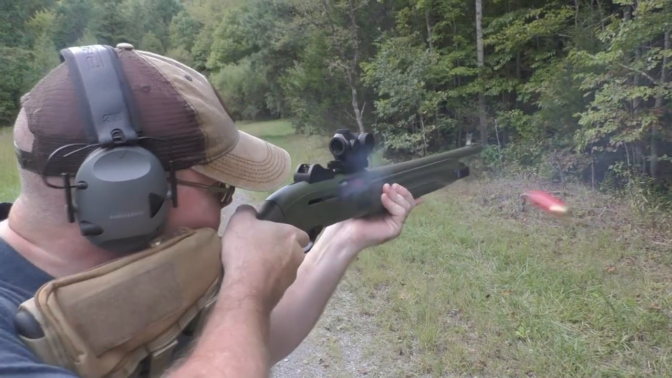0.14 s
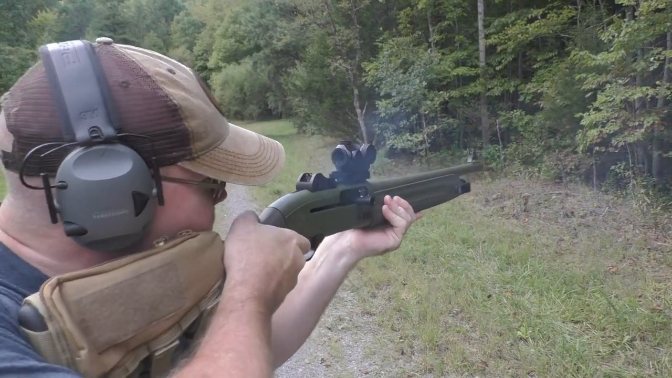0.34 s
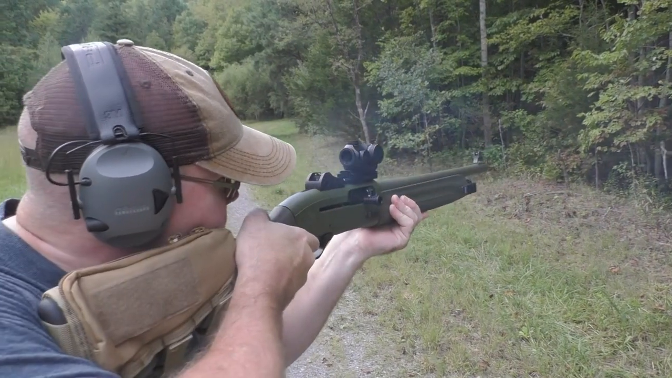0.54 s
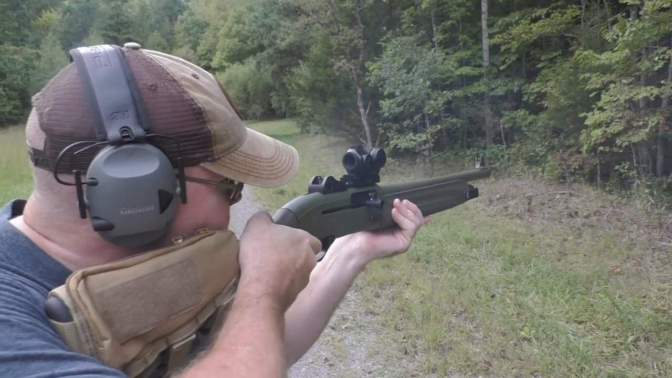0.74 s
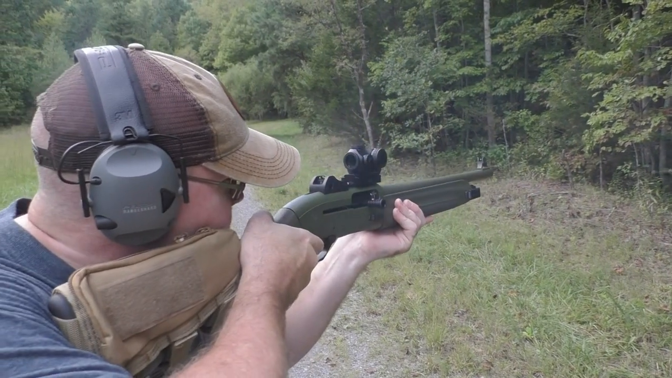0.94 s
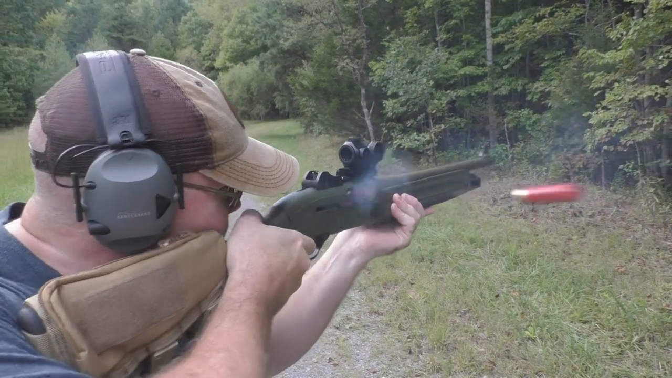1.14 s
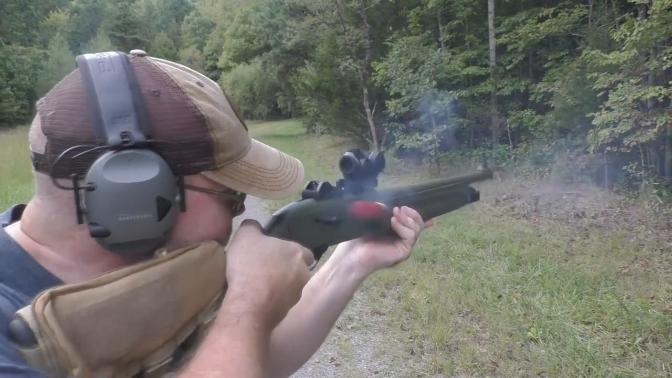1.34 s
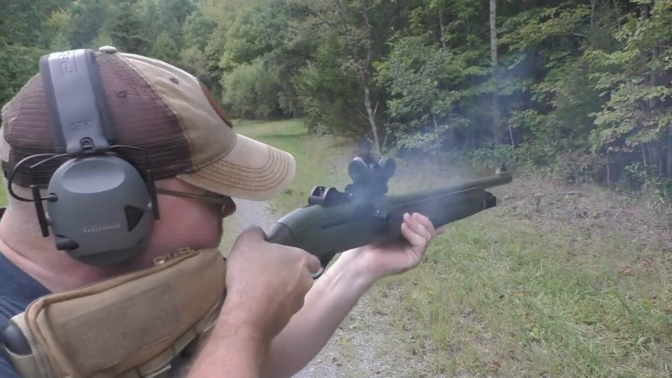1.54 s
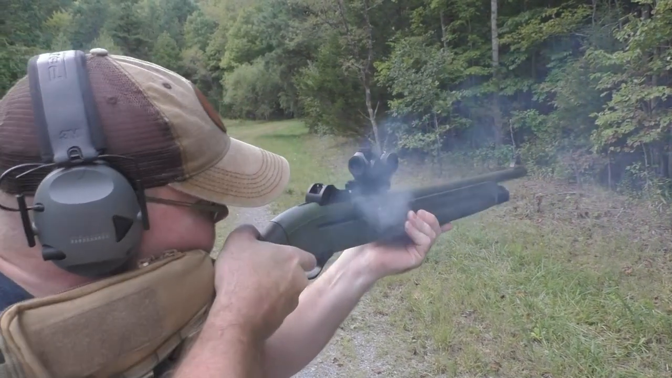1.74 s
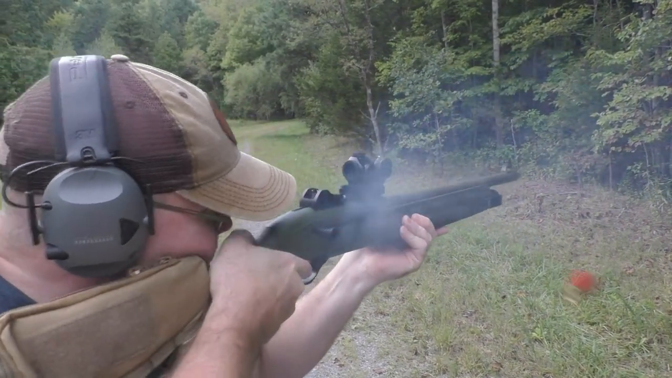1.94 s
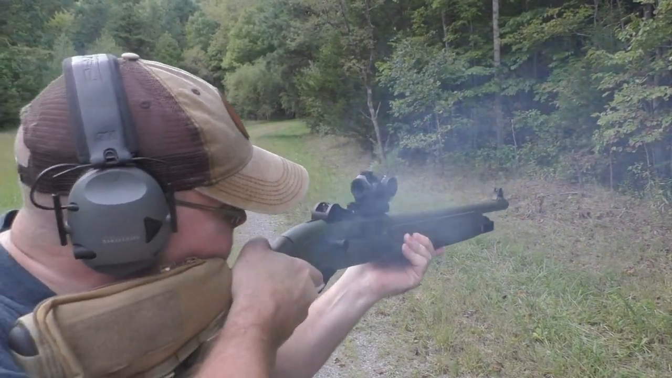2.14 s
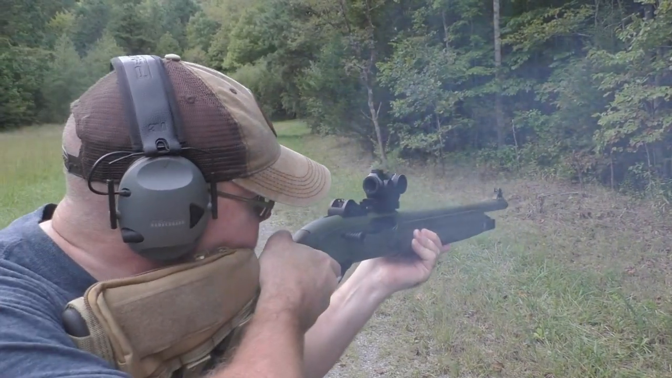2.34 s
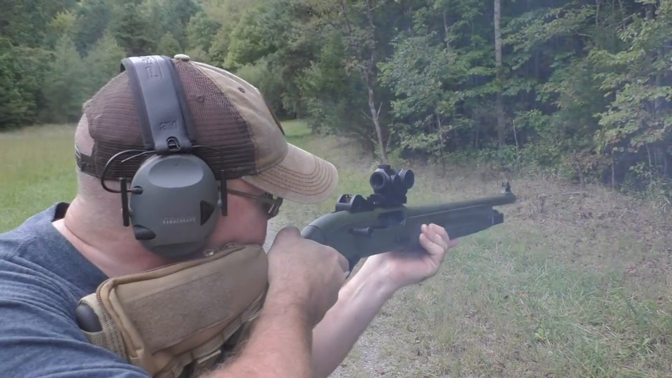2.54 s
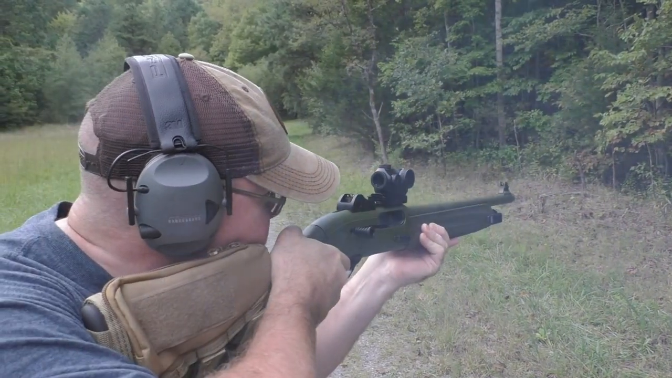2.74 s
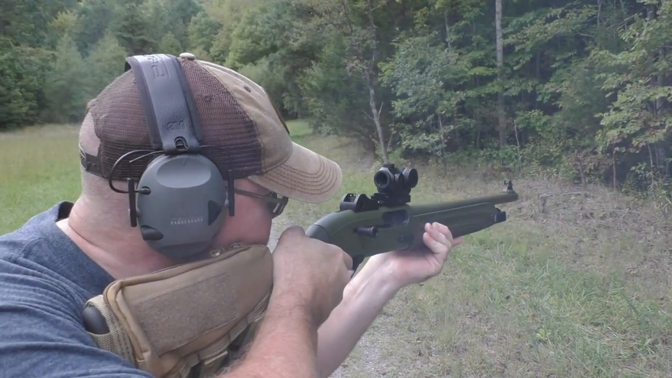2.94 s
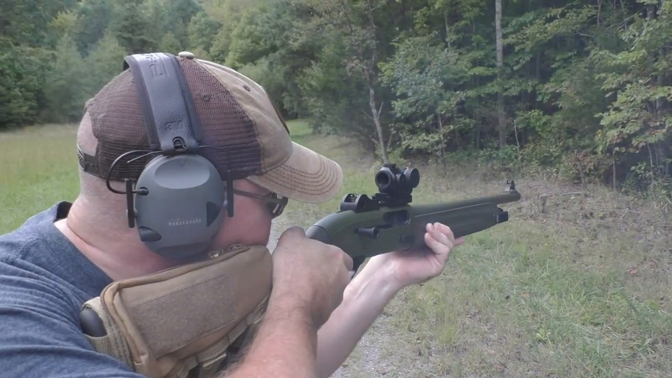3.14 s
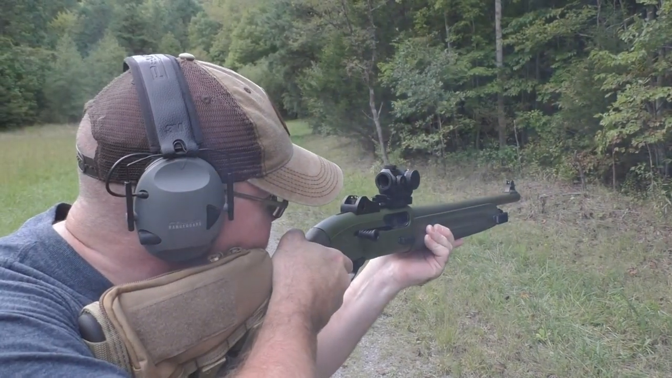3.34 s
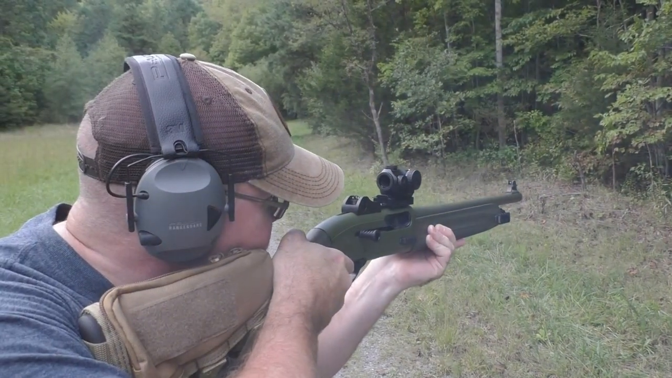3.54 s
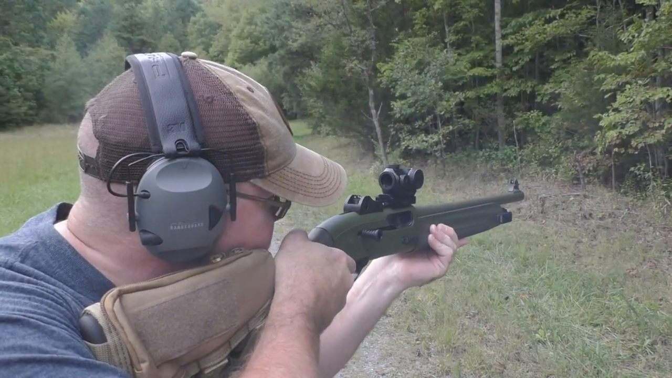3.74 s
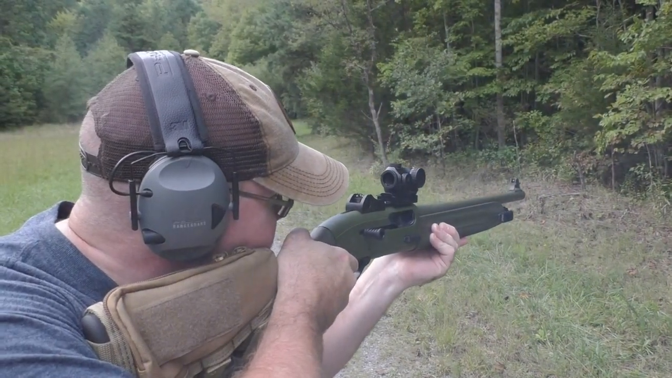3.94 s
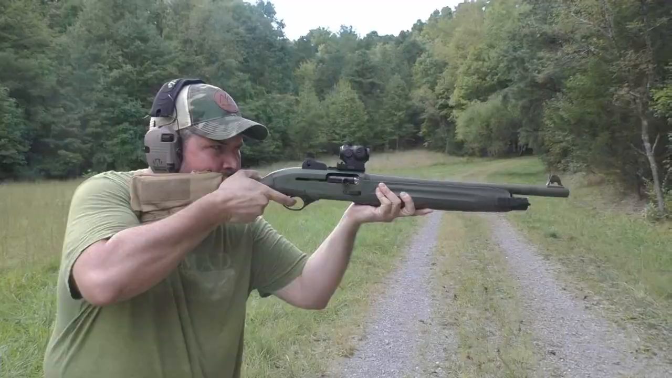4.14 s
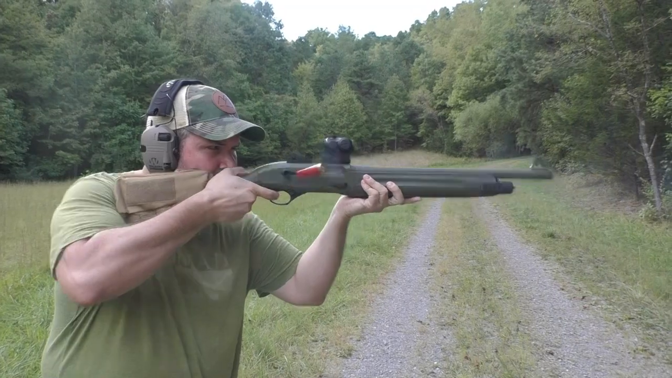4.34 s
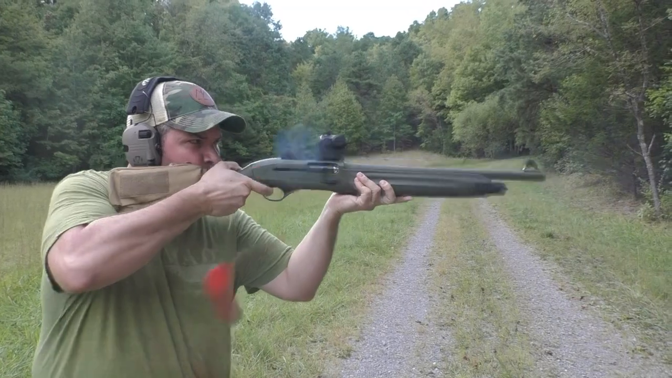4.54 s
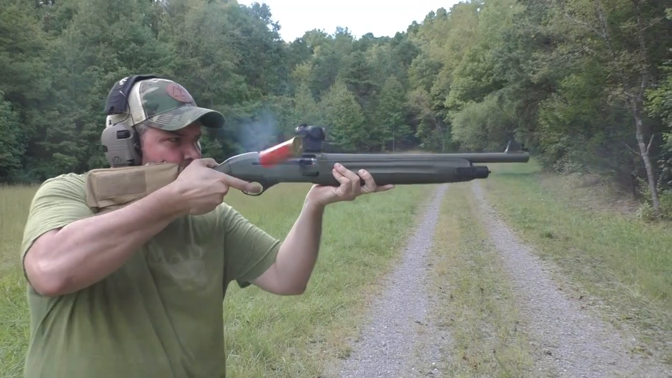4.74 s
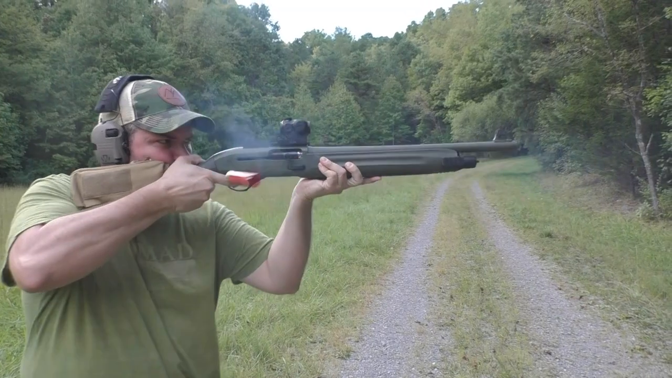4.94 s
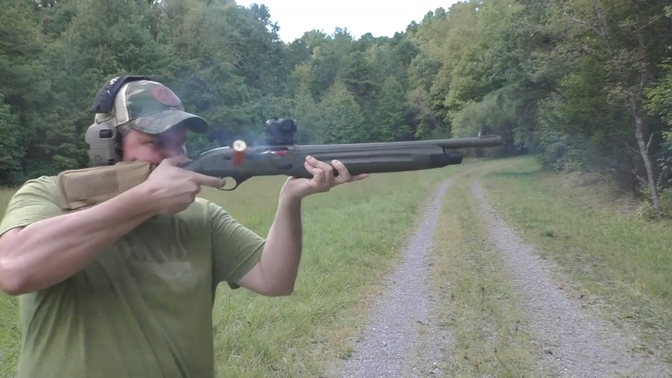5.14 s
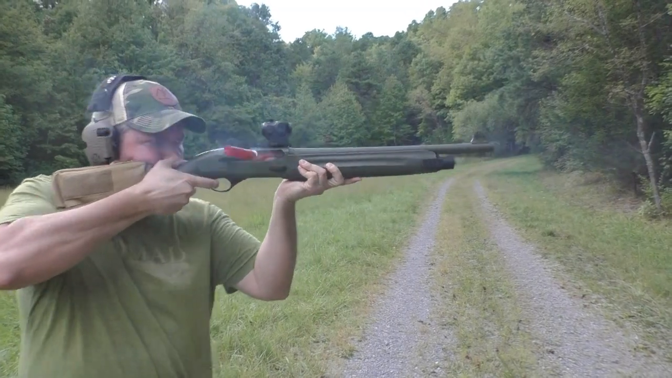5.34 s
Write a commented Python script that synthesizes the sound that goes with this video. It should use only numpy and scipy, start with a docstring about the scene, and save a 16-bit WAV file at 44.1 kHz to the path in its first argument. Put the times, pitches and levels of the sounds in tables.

```python
"""On a forest range, a semi-automatic shotgun is fired beside the camera, from two stands in turn.
Each shot is a burst of noise with metal clacks, low thumps off large surfaces, a crackle from near trees
and a long roll through the woods. Small gun clicks are shaped noise too.
Behind them are still air, pulsing crickets and, at the second stand, a katydid.
The camera's gain control ducks at every shot and lets the echo swell back."""
import sys
import numpy as np
from scipy import signal
from scipy.fft import rfft, irfft
from scipy.io import wavfile
from scipy.ndimage import uniform_filter1d, minimum_filter1d

SR = 44100
rng = np.random.default_rng(int(sys.argv[2]) if len(sys.argv) > 2 else 0)


def dump(signal):
    """Clip the signal to [-1, 1] and save it as 16-bit WAV at the path in sys.argv[1]."""
    limited = np.clip(np.atleast_2d(signal).T, -1, 1)
    pcm = np.round(limited * 32767).astype(np.int16)
    wavfile.write(sys.argv[1], SR, pcm)


N = 237875
TIME = np.arange(N) / SR  # seconds
MOVE_S = 4.132  # the second stand begins here

# Stereo width of sound from close by. Each row: pitch in Hz, side level minus middle level in dB.
NEAR_WIDTH = [(100, -1), (400, -5), (1200, -2), (2500, -3), (4500, -6), (8000, -17), (15000, -17)]
# Stereo width of sound from far off. Each row: pitch in Hz, side level minus middle level in dB.
FAR_WIDTH = [(100, -5), (400, -13), (1300, -6), (2500, -3), (4500, -4), (8000, -12), (15000, -15)]


def undb(db):
    """Turn decibels into a gain factor."""
    return 10 ** (np.asarray(db) / 20)


def on_log_axis(hz, points):
    """Read a value at each pitch from (Hz, value) points, with pitch on a logarithmic axis."""
    point_hz, value = np.transpose(points)
    return np.interp(np.log(np.maximum(hz, 1)), np.log(point_hz), value)


def noise(colour, width, count=N):
    """Stereo noise of rms 1: random phases with a given spectrum and stereo width."""
    hz = np.fft.rfftfreq(count, 1 / SR)
    mid, side = np.exp(2j * np.pi * rng.random((2, len(hz))))
    spread = undb(on_log_axis(hz, width))
    gain = undb(on_log_axis(hz, colour)) / np.sqrt(1 + spread ** 2)
    left, right = mid + spread * side, mid - spread * side
    sound = irfft(gain * np.array([left, right]), count)
    return sound / sound.std()


def walk(rate, count=N):
    """Smooth random wandering: random steps at about this rate in Hz, averaged over one step."""
    hold = max(int(SR / rate), 2)
    steps = np.repeat(rng.standard_normal(count // hold + 1), hold)
    return uniform_filter1d(steps, hold)[:count]


def add(out, sound, start_s):
    """Mix a sound into out at a given time, leaving off whatever falls outside."""
    start = int(round(start_s * SR))
    begin, end = max(start, 0), min(start + sound.shape[1], out.shape[1])
    if end > begin:
        out[:, begin:end] += sound[:, begin - start:end - start]


def burst(t, rise_s, hold_s, decay_s):
    """Loudness curve that rises in a straight line, holds and dies away."""
    return np.clip(t / rise_s, 0, 1) * np.exp(-np.maximum(t - hold_s, 0) / decay_s)


def band_of(spectrum, octaves_off):
    """One band of a spectrum, as sound; it fades to nothing one octave either side of its centre."""
    return irfft(spectrum * np.maximum(1 - abs(octaves_off), 0))


def muzzle_blast(colour, length_s):
    """The shock and the turbulent gas jet behind it, as a noise burst that is new at every shot."""
    t = TIME[:SR // 8]
    jet = noise(colour, NEAR_WIDTH, count=len(t))
    return jet * burst(t, rise_s=.002, hold_s=length_s, decay_s=.0075)


def steel(db, length_s):
    """A short, dry sound coloured like the clack of steel parts in the gun, made of noise."""
    t = TIME[:SR // 8]
    # Each row: pitch in Hz, strength in dB.
    colour = [(100, -15), (330, 5), (800, -7), (1500, 0), (3500, -3), (6000, -7), (10500, -3), (15500, -8)]
    clack = noise(colour, NEAR_WIDTH, count=len(t))
    return undb(db) * clack * burst(t, rise_s=.001, hold_s=length_s, decay_s=.005)


def thump(distance):
    """A few cycles of low pressure return from each large surface; distance stretches their delays."""
    # Ground slap, gas swell, nearest trunks, the bank's boom and knock, the wood's edge.
    # Each row: delay in seconds before stretching, average pitch in Hz, half length in seconds, level in dB.
    low_waves = [(.008, 122, .005, 7), (.02, 42, .016, -1.5), (.02, 300, .007, .5), (.04, 82, .014, -1),
                 (.046, 262, .004, 4), (.122, 318, .0055, 3)]
    # Far slopes answer with evenly spaced low knocks, each 2 dB weaker; same columns.
    slopes = [(.362 + .1 * k, 345, .01, -12 - 2 * k) for k in range(3)]
    # The earliest wave comes from the side; later ones come more and more from ahead.
    side_phase_rad, turn_ahead_s = 2.1, .045
    ears = np.array([[.5], [-.5]])  # left and right share the phase difference
    t, out = TIME[:2 * SR // 3], 0
    for delay, hz, length, db in low_waves + slopes:
        nearness = np.exp(-delay / turn_ahead_s)
        # No two shells push alike, so the pitch varies, most of all in the early waves.
        pitch = hz * (1 + (.02 + .14 * nearness) * rng.standard_normal())
        since = t - delay * distance
        swing = np.sin(2 * np.pi * pitch * since + ears * side_phase_rad * nearness)
        out = out + undb(db) * np.exp(-(since / length) ** 2) * swing
    return out


def near_trees(colour, db, arrive_s, decay_s):
    """Trunks and bushes close by throw back a dense, uneven crackle."""
    t = TIME[:SR // 2]
    uneven = undb(2.4 * walk(900, count=len(t)) + .8 * walk(120, count=len(t)))
    envelope = burst(t, rise_s=.018, hold_s=arrive_s, decay_s=decay_s)
    return undb(db) * noise(colour, NEAR_WIDTH, count=len(t)) * uneven * envelope


def woods(db):
    """The long roll: it spreads with distance, loses treble on the way and blooms at the forest edge."""
    # Colour of the far woods; soft ground swallows a band near 800 Hz.
    # Each row: pitch in Hz, strength in dB per Hz.
    woods_colour = [(30, -30), (90, -21), (170, -19), (290, -4), (440, 1), (620, -7), (830, -14),
                    (1150, -5), (1900, -5), (3200, -9), (6000, -15), (10000, -15), (15500, -21)]
    # Air and foliage take more at high pitch, the ground takes more in the bass.
    # The losses are in dB per second, air and ground at 1 kHz; the power is a plain number.
    base_loss, air_loss, ground_loss, air_power = 2.8, 6.2, 1.1, .78
    # The roll builds up, then blooms at the edge; its lows come later (rise and edge times at 1 kHz).
    rise_s, rise_power, spread_s = .27, 1.3, .1
    edge_s, edge_width_s, edge_bloom_db, later_per_octave = .36, .16, 3.5, .14

    t = TIME[:3 * SR]
    spectrum = rfft(noise(woods_colour, FAR_WIDTH, count=len(t)))
    hz = np.fft.rfftfreq(len(t), 1 / SR)
    octave = np.log2(np.clip(hz, 125, 16000) / 125)  # octaves above 125 Hz
    out = 0
    for k in range(8):
        khz = 2 ** k / 8  # centre of this band
        loss_db = (base_loss + air_loss * khz ** air_power + ground_loss / khz) * t
        reach_s = t * khz ** later_per_octave
        edge_db = edge_bloom_db * np.exp(-((reach_s - edge_s) / edge_width_s) ** 2)
        rise = np.clip(reach_s / rise_s, 0, 1) ** rise_power
        clumps_db = 2.1 * walk(55, count=len(t))  # groups of trees answer one after another
        out = out + band_of(spectrum, octave - k) * rise * undb(clumps_db + edge_db - loss_db)
    return undb(db) * out / (1 + t / spread_s)


def stand(shots, blast_colour, trees, roll, distance, right_db):
    """All shots from one spot: blast and thump are new each time, trees and roll answer the same way."""
    # One strength drives the blast, trees, thump, bolt and roll; a longer blast pushes more air.
    blast_db, thump_db, usual_length_s, push_db_per_doubling = 14.5, -.5, .005, 3.1
    tick_lead_s, bolt_delay_s, bolt_db = .0035, .111, -5.5
    near, far = np.zeros((2, 2, N))
    for s, db, length_s in shots:
        push_db = push_db_per_doubling * np.log2(length_s / usual_length_s)
        # A faint short tick is heard just before the blast.
        add(near, steel(db=-22, length_s=.002), s - tick_lead_s)
        add(near, undb(blast_db + db) * muzzle_blast(blast_colour, length_s), s)
        add(near, undb(blast_db + db + push_db) * trees, s)
        add(near, steel(db=bolt_db + db, length_s=.012), s + bolt_delay_s)  # the bolt slams shut
        add(far, undb(thump_db + db + push_db) * thump(distance), s)
        add(far, undb(db) * roll, s)
    # Near sound is louder on the right: left goes down as much as right goes up.
    return near * undb(np.array([[-right_db], [right_db]])) + far


def clicks():
    """Trigger and gun fittings make short metal ticks, each with a fainter rattle dying away after it."""
    # Each row: start in seconds, level in dB, rattle level against the tick in dB.
    click_times = [(.8186, -15, -21), (2.549, -37, -24), (3.6655, -39, -9), (4.051, -51, -16)]
    # Colour of the small metal parts. Each row: pitch in Hz, strength in dB per Hz.
    click_colour = [(600, -15), (1800, -1), (3500, -2), (6000, -4), (9500, 0), (13000, -2), (16000, -7)]
    out, t = np.zeros((2, N)), TIME[:SR // 2]
    for s, db, rattle_db in click_times:
        tick = burst(t, rise_s=.0005, hold_s=.002, decay_s=.002)
        rattle = undb(rattle_db) * np.exp(-t / .15)
        add(out, undb(db) * (tick + rattle) * noise(click_colour, FAR_WIDTH, count=len(t)), s)
    return out


def meadow(moved):
    """Still air and crickets are noise, the crickets pulsing; a katydid pulses at the second stand."""
    # Colour of the still air. Each row: pitch in Hz, strength in dB per Hz.
    air_colour = [(25, -7), (60, -5), (95, 5), (150, -9), (350, -5), (700, -12), (1500, -12), (3500, -19),
                  (5000, -16), (9500, -14), (15500, -17)]
    # Colour of the cricket chorus. Each row: pitch in Hz, strength in dB per Hz.
    cricket_colour = [(5300, -35), (5900, -12), (6200, -1), (6550, 0), (7000, -10), (8000, -17),
                      (10000, -35)]
    # Colour of the katydid. Each row: pitch in Hz, strength in dB per Hz.
    katydid_colour = [(9000, -30), (12000, -12), (13300, -5), (14400, 0), (16000, -2)]

    # The still air is quieter at the second stand.
    air_db = np.where(moved, -55.7, -53.7) + 1.1 * walk(6)
    air = noise(air_colour, FAR_WIDTH) * undb(air_db)

    # As the camera's gain recovers, the chorus is heard rising to its full level at the first stand.
    # This rise is written straight into its level; at the second stand the chorus is closer.
    full_db, close_db, faint_db = -54, -48.5, -63
    rise_end_s, rise_db_per_s = 3.7, 9
    rising_db = np.maximum(full_db - rise_db_per_s * np.maximum(rise_end_s - TIME, 0), faint_db)
    pulse_hz = 33.8 * (1 + .03 * walk(4))
    wings = np.cos(2 * np.pi * np.cumsum(pulse_hz) / SR)
    chorus_db = np.where(moved, close_db, rising_db) + 2.6 * wings + 1.1 * walk(70)
    crickets = noise(cricket_colour, FAR_WIDTH) * undb(chorus_db)

    katydid_hz, katydid_db, stroke_db = 20.7, -48, 5
    strokes = np.cos(2 * np.pi * katydid_hz * (TIME - MOVE_S))
    katydid = noise(katydid_colour, FAR_WIDTH) * undb(katydid_db + stroke_db * strokes) * moved
    return air + crickets + katydid


def scene():
    """The first stand, then an abrupt change to the second, over the meadow."""
    # Shots; the first comes before time zero, so only its fading echo is heard.
    # Each row: start in seconds, strength in dB, blast length in seconds.
    shots = [(-.75, -6.5, .005), (.1683, 2.5, .005), (1.1793, 1, .008), (1.4267, -3, .005),
             (1.7111, -4.5, .005), (1.9641, -6.3, .005), (4.402, 2, .007), (4.6589, 1, .007),
             (4.9296, -1.5, .004), (5.1671, -2.3, .004)]
    # Colour of the muzzle blast at the first stand. Each row: pitch in Hz, strength in dB per Hz.
    first_blast = [(59, -31), (100, -1), (319, 0), (640, -8), (1490, -2), (2220, -5), (2470, -2),
                   (3690, -5), (4750, -12), (5280, -8), (6950, -11), (7560, -8), (10200, -8), (11500, -6),
                   (15500, -12)]
    # Colour of the muzzle blast at the second stand. Each row: pitch in Hz, strength in dB per Hz.
    second_blast = [(59, -32), (100, -2), (394, 0), (742, -10), (1430, 0), (2130, -4), (2580, -1),
                    (2810, -3), (3460, -3), (5170, -8), (5750, -7), (8410, -8), (9150, -5), (11100, -5),
                    (15500, -7)]
    # Scatter from the near trees at the first stand. Each row: pitch in Hz, strength in dB per Hz.
    first_tree_colour = [(88, -36), (150, -6), (205, -10), (332, 0), (481, -1), (631, -12), (708, -7),
                         (844, -19), (1270, -7), (2140, -8), (6470, -15), (10500, -14), (15500, -22)]
    # Scatter from the near trees at the second stand. Each row: pitch in Hz, strength in dB per Hz.
    second_tree_colour = [(88, -36), (150, -6), (230, -8), (308, -2), (445, 1), (583, -12), (736, -13),
                          (844, -18), (1400, -8), (2100, -11), (2500, -11), (10900, -18), (15500, -24)]

    moved = TIME >= MOVE_S
    first_shots = [row for row in shots if row[0] < MOVE_S]
    first_trees = near_trees(first_tree_colour, db=-10, arrive_s=.038, decay_s=.054)
    first = stand(first_shots, first_blast, first_trees, woods(db=1.7), distance=1, right_db=.8)

    second_shots = [row for row in shots if row[0] >= MOVE_S]
    second_trees = near_trees(second_tree_colour, db=-11.4, arrive_s=.044, decay_s=.057)
    second = stand(second_shots, second_blast, second_trees, woods(db=.4), distance=1.04, right_db=1.1)
    return np.where(moved, second, first + clicks()) + meadow(moved)


def recover(cut_db, db_per_s):
    """A gain cut that follows every rise at once and lets go at a steady rate."""
    ramp = db_per_s * TIME
    return np.maximum.accumulate(cut_db + ramp) - ramp


def gain_control(x, threshold_db, slope, hold_s, slow_share, fast_db_per_s, slow_db_per_s):
    """Loud sound turns the gain down; after a hold it comes back, partly fast and partly slowly."""
    # The shifted windows look almost only at the past.
    power = uniform_filter1d(np.mean(x ** 2, axis=0), size=256, origin=110)
    level_db = 10 * np.log10(np.maximum(power, 1e-12))
    cut_db = slope * np.maximum(level_db - threshold_db, 0)
    half = int(hold_s * SR / 2)
    held_db = -minimum_filter1d(-cut_db, 2 * half + 1, origin=half, mode="nearest")
    slow_db = recover(slow_share * held_db, slow_db_per_s)
    fast_db = recover((1 - slow_share) * held_db, fast_db_per_s)
    return x * undb(-(slow_db + fast_db))


def record(dry):
    """The camera rides its gain, rounds the highest peaks and cuts the top of the treble."""
    ridden = gain_control(dry, threshold_db=-20.0, slope=.75, hold_s=.14,
                          slow_share=.46, fast_db_per_s=100, slow_db_per_s=6)
    ceiling, top_hz = .88, 15850
    rounded = ceiling * np.tanh(ridden / ceiling)
    treble_cut = signal.ellip(10, .2, 80, top_hz, fs=SR, output="sos")
    return signal.sosfilt(treble_cut, rounded)


dry = scene()
out = record(dry)
dump(out)
```